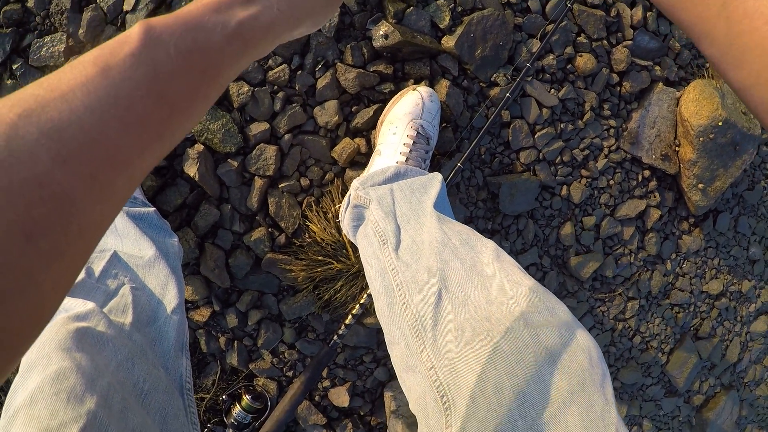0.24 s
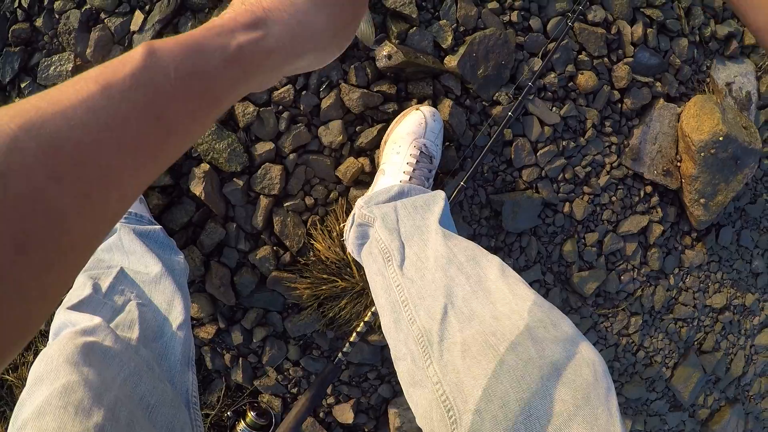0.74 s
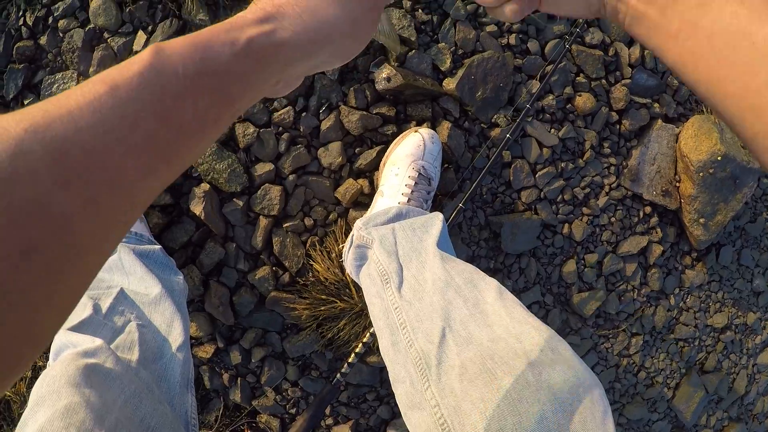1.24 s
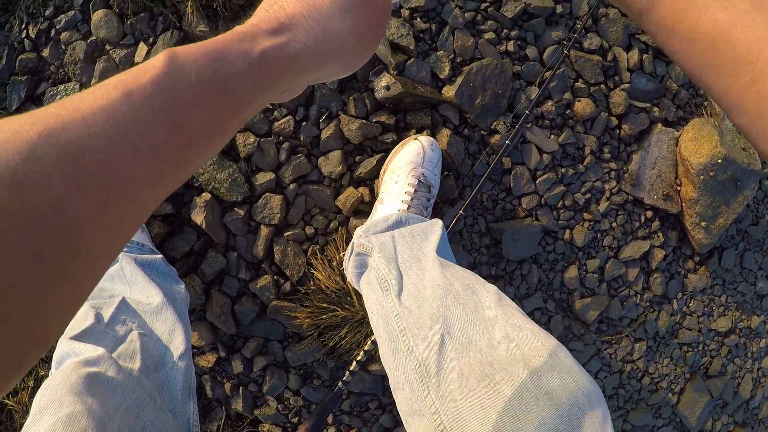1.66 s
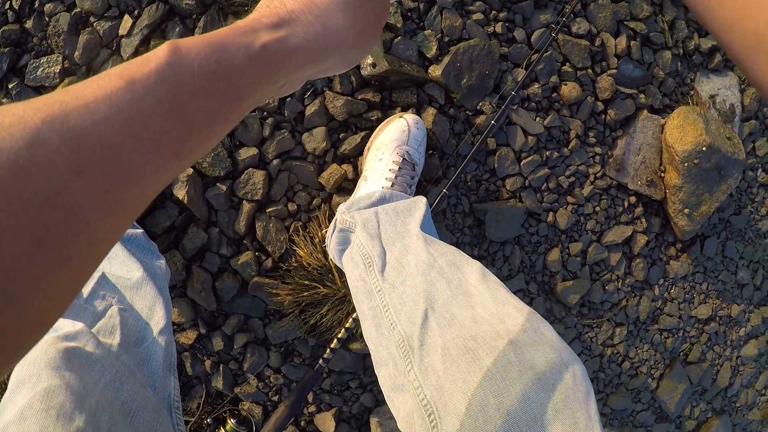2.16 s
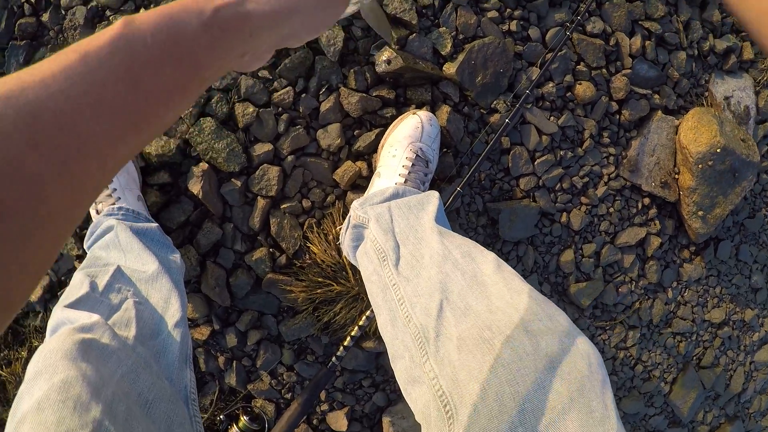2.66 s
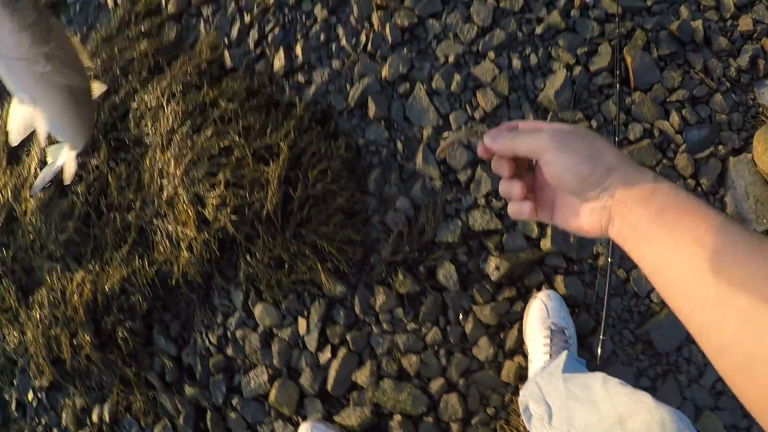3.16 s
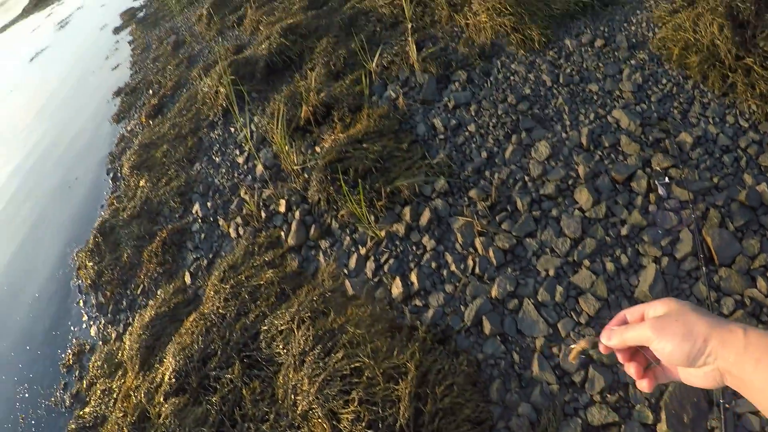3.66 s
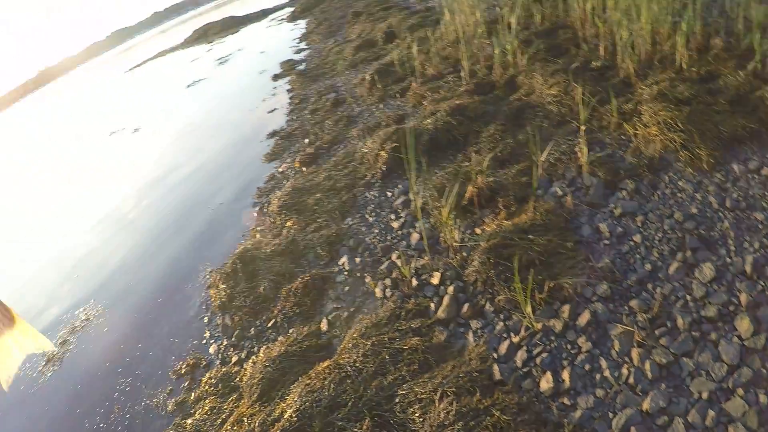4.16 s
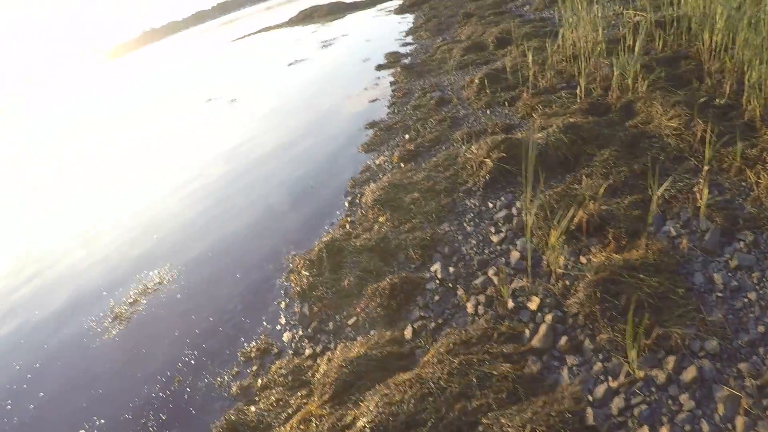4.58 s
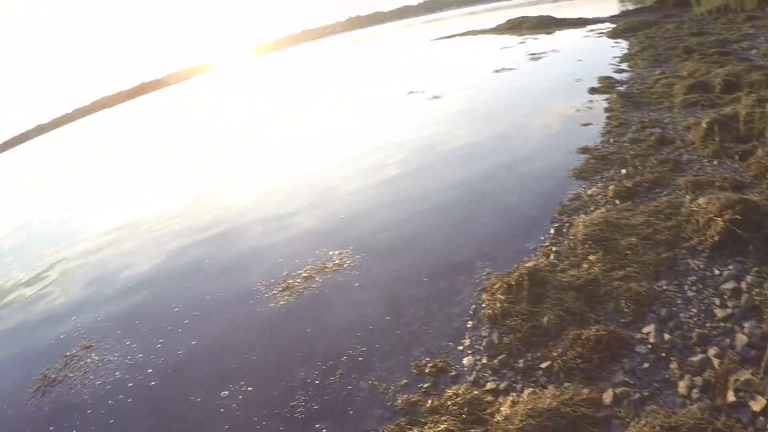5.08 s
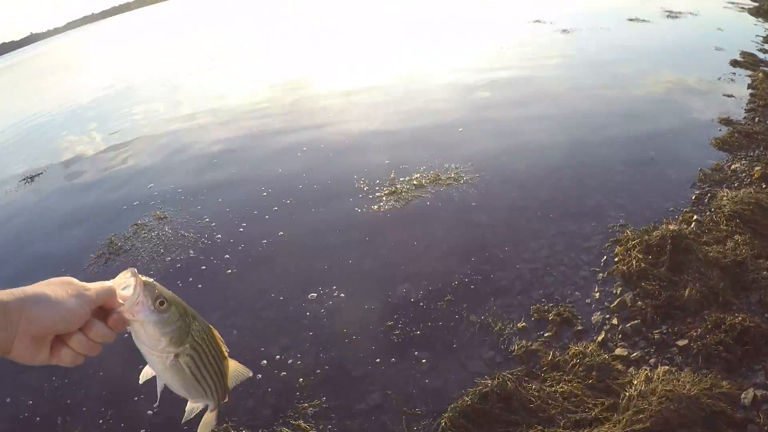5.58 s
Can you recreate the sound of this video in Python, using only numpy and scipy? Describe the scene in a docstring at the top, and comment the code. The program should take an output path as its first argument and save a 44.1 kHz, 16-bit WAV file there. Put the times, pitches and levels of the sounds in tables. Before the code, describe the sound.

Stones tick faintly and a breeze rumbles while a camera's plastic case clacks and rattles in its mount, then briefly scrapes.

```python
"""Light air rumbles on the microphone, clothes rustle faintly and stones tick underfoot.
An angler is carrying a fish over a stony shore to calm water, heard from a camera worn on the body.
Right at the microphone, jolts bump the camera's plastic case softly or knock it against its mount:
the case rings briefly and the padded mount thumps. Near the end, clothing swishes
and something scrapes over the case."""
import sys
import numpy as np
from scipy.fft import rfft, irfft, next_fast_len
from scipy.io import wavfile

SR = 44100
rng = np.random.default_rng(int(sys.argv[2]) if len(sys.argv) > 2 else 0)


def put_to_file(sound):
    """Save the sound as 16-bit audio at rate SR, in the file named by the first command-line argument."""
    columns = np.atleast_2d(sound).T  # one column per channel
    safe = np.clip(columns, -1, 1)
    whole_steps = np.round(safe * 32767)
    wavfile.write(sys.argv[1], SR, whole_steps.astype(np.int16))


N = 257103


def amp(db):
    """Decibels to gain."""
    return 10 ** (np.asarray(db) / 20)


def unit(x):
    """Scale to rms 1."""
    return x / np.sqrt(np.mean(x ** 2) + 1e-20)


def curves(rows):
    """One value per sample for each column after the time."""
    times, *columns = np.transpose(rows)
    return [np.interp(np.arange(N) / SR, times, column) for column in columns]


def swell(s, db, rise, fall, hold=0):
    """An envelope that peaks at time s and may hold there; rise and fall are in dB a second."""
    t = np.arange(N) / SR - s
    return amp(db - rise * np.maximum(-t, 0) - fall * np.maximum(t - hold, 0))


def filtered(x, response):
    """Pass x through a gain that depends on frequency."""
    size = next_fast_len(N + SR // 2)
    return irfft(rfft(x, size) * response(np.fft.rfftfreq(size, 1 / SR)), size)[..., :N]


def coloured(x, spectrum):
    """x shaped by (f/Hz, level/dB) points on a log axis, at rms 1."""
    f, db = np.transpose(spectrum)
    return unit(filtered(x, lambda hz: amp(np.interp(np.log(hz + 1), np.log(f), db))))


def grit(rate, spread_db, smooth):
    """Friction: tiny slips of uneven size, rate a second, on a share of smooth noise."""
    slips = (rng.random(N) < rate / SR) * rng.choice([-1, 1], N)
    sizes = amp(spread_db * rng.standard_normal(N))
    return unit(unit(slips * sizes) + smooth * rng.standard_normal(N))


def ring(modes, attack, scatter_db, detune, pitch=1, length=1):
    """A tenth of a second of struck modes at rms 1; each blow weights and bends them differently."""
    t = np.arange(SR // 10) / SR
    hz, db, t60 = np.transpose(modes)[:, :, None]
    size, bend, phase = rng.standard_normal((3, len(modes), 1))
    onset = 1 - np.exp(-t * np.sqrt(hz / 1e3) / attack)  # high modes speak sooner
    fade = amp(db + scatter_db * size - 60 * t / (t60 * max(length, 0.1))) / t60
    tones = np.sin(2 * np.pi * hz * pitch * (1 + detune * bend) * t + phase)
    return unit(np.sum(onset * fade * tones, 0))


def add(track, s, sound):
    """Mix a sound into the track at time s."""
    part = track[round(s * SR):][:len(sound)]
    part += sound[:len(part)]


# Shore breeze, straight on the microphone: t/s, level/dB
SHORE_BREEZE = [(0, -54), (2.9, -53.5), (3.5, -49), (4.55, -49), (5.2, -44.5), (5.83, -42.5)]
# Puffs on top of it: t/s, level/dB
AIR_PUFFS = [(.05, -47.5), (.6, -45.5), (1.13, -43.5), (1.68, -38), (2.22, -45.5), (4.35, -42), (4.74, -37),
             (4.87, -39), (5.39, -38), (5.5, -26)]
# Rumble of air at the microphone: f/Hz, level/dB
WIND_SPECTRUM = [(10, 2), (20, 7), (33, 7), (50, -2), (75, -16.5), (120, -30.5), (300, -97)]


def wind():
    """A light breeze with short puffs rumbles as it flows over the microphone."""
    breeze_db, = curves(SHORE_BREEZE)
    puffs = sum(swell(s, db, rise=238, fall=211) for s, db in AIR_PUFFS)
    return (amp(breeze_db) + puffs) * coloured(rng.standard_normal(N), WIND_SPECTRUM)


# Background hiss on the shore: f/Hz, level/dB
HISS_SPECTRUM = [(180, -36), (300, -4.5), (439, -6), (631, -7), (849, -4.5), (985, -4), (1140, 0),
                 (1490, -5.5), (1560, -3), (2000, -5.5), (2280, -12.5), (3750, -10.5), (5660, -14.5),
                 (14800, -22), (15500, -32.5)]


def hiss():
    """A faint, steady hiss lies under everything."""
    return amp(-64.5) * coloured(rng.standard_normal(N), HISS_SPECTRUM)


# The angler's motion, just behind the microphone: t/s, case hollow/dB, effort/dB, mount shaking/dB
BODY_MOTION = [(0.0, -69, -67.5, -63), (1.02, -67.5, -70, -64.5), (1.46, -68, -65.5, -60.5),
               (1.7, -70, -71.5, -61.5), (1.9, -69, -70.5, -64.5), (2.66, -65, -67.5, -62),
               (3.07, -63, -62.5, -56), (3.39, -59, -60, -54.5), (3.7, -53, -58, -56), (3.9, -56, -60, -57),
               (4.06, -60, -63, -58.5), (4.47, -57, -62, -59), (4.76, -55.5, -60, -52),
               (5.0, -56, -62.5, -63), (5.2, -59, -65.5, -63), (5.41, -56, -58, -59),
               (5.55, -60.5, -63.5, -58), (5.83, -61.5, -60.5, -55)]
# Air resonances inside the case: f/Hz, width/Hz, level/dB
CASE_CAVITY = [(1270, 690, -10.5), (1733, 195, 1.5)]
# Low shudder, through the mount to the microphone: f/Hz, level/dB
SHUDDER_SPECTRUM = [(40, -10), (90, 4), (180, -4.5), (280, -8.5), (450, -23.5), (800, -31), (1500, -56)]
# Shoe scuffs in the gravel, down at the feet: t/s, level/dB
SHOE_SCUFFS = [(2.82, -66), (2.95, -63), (3.76, -54), (4.7, -54), (5.79, -62)]
# Clothes close by and gravel below: f/Hz, level/dB
RUSTLE_SPECTRUM = [(400, -10.5), (650, -5.5), (850, -7.5), (1200, 2), (1500, -10), (2050, -0.5), (2400, 3),
                   (2900, -4.5), (3400, -7), (4400, -14.5), (5500, -17.5), (8000, -33.5), (15000, -35)]
MEAN_EFFORT_DB = -64


def walking():
    """Walking stirs the air in the case, rubs clothes and gravel, and shakes the mount."""
    def cavity(hz):
        return sum(amp(db) / (1 + (2 * (hz - centre) / width) ** 2) for centre, width, db in CASE_CAVITY)

    hollow_db, effort_db, shaking_db = curves(BODY_MOTION)
    hollow = amp(hollow_db + 0.5) * unit(filtered(rng.standard_normal(N), cavity))
    clothes = amp(-64 + 1.29 * (effort_db - MEAN_EFFORT_DB))
    scuffs = sum(swell(s, db, rise=130, fall=114) for s, db in SHOE_SCUFFS)
    friction = coloured(grit(rate=600, spread_db=4.4, smooth=1.2), RUSTLE_SPECTRUM)
    shudder = coloured(grit(rate=100, spread_db=4.2, smooth=1.0), SHUDDER_SPECTRUM)
    return hollow + np.hypot(clothes, scuffs) * friction + amp(shaking_db + 2) * shudder


# The clearest ticks, from stones underfoot and tackle nearby: t/s, level/dB, relative edge/dB
STONE_TICKS = [(0.0982, -42, -30), (0.2396, -42.5, -26.5), (0.2922, -48.5, -24), (0.3486, -50.5, -18),
               (1.3195, -47, -11), (2.2277, -45.5, -22), (2.7091, -42.5, -30), (2.767, -46.5, -30),
               (2.81, -47, -32), (2.8563, -44, -30), (4.0023, -52, -26), (4.106, -45.5, -21),
               (4.2004, -46.5, -14), (4.2353, -43, -23), (4.7414, -37.5, -8), (4.9466, -46.5, -8),
               (5.7435, -36, -18)]
# A tick's sharp edge: f/Hz, level/dB
EDGE_SPECTRUM = [(2200, -22), (3500, 10.5), (7000, 2), (9500, -10), (12000, -24), (16000, -26)]
# Modes of the plastic case at the microphone; ticks use them pitched down: f/Hz, level/dB, t60/s
CASE_MODES = [(631, -2, 0.024), (1006, -8, 0.042), (1189, 4.5, 0.029), (1292, 4, 0.025), (1697, 2, 0.027),
              (1744, 11, 0.016), (1865, -4, 0.067), (2215, -1, .056), (2390, 2.5, .022), (2696, 2.5, 0.016),
              (2870, 0.5, .028), (3320, -1, 0.0069), (3430, -7, 0.021), (3920, -15.5, 0.022),
              (4324, -12.5, 0.013), (4830, -19.5, 0.025), (5040, -14.5, 0.012), (5730, -22.5, 0.012),
              (6260, -18.5, 0.0084), (6910, -28.5, 0.012), (10100, -35, 0.0062), (10600, -41, .008),
              (13800, -41, 0.0055)]
# Bounds of its low, main, upper, bright and snap families of modes: f/Hz
FAMILY_BOUNDS = [500, 1450, 2100, 3100, 4000, 16000]


def ticks():
    """Stones and tackle touch lightly, each at its own pitch: a clack, a hollow body and a sharp edge."""
    tones, edges = np.zeros((2, N))
    t = np.arange(SR // 50) / SR
    clack_modes = family(FAMILY_BOUNDS[2], FAMILY_BOUNDS[3])
    body_modes = family(FAMILY_BOUNDS[0], FAMILY_BOUNDS[2])
    for s, db, edge_db in list(STONE_TICKS) + settling_stones(count=30):
        clack = ring(clack_modes, attack=0.0019, scatter_db=10, detune=0.044, pitch=0.93)
        body = ring(body_modes, attack=0.00053, scatter_db=-0.5, detune=0.11, pitch=0.85)
        add(tones, s, amp(db - 23) * clack + amp(db - 24.5) * body)
        add(edges, s, amp(db + edge_db - 60 * t / 0.028))
    return tones + edges * coloured(rng.standard_normal(N), EDGE_SPECTRUM)


def settling_stones(count, edge_db=-24):
    """Rows of faint ticks as stones settle at random times, louder as the body moves harder."""
    motion_times, _, effort_db, _ = np.transpose(BODY_MOTION)
    times = rng.random(count) * N / SR
    extra_effort_db = np.interp(times, motion_times, effort_db) - MEAN_EFFORT_DB
    levels = -50.5 + 0.67 * extra_effort_db + rng.standard_normal(count)
    return [(s, db, edge_db) for s, db in zip(times, levels)]


def family(lo_hz, hi_hz):
    """The modes of the case in a range of pitch."""
    return [mode for mode in CASE_MODES if lo_hz <= mode[0] < hi_hz]


# Modes of the mount, between body and camera: f/Hz, level/dB, t60/s
MOUNT_MODES = [(88.8, -3.5, 0.053), (144, 3.5, 0.024), (244.7, -2.5, 0.042), (370, -14.5, 0.023)]
# Soft bumps, through the mount to the microphone: t/s, level/dB
SOFT_BUMPS = [(1.32, -41.5), (3.062, -39.5), (3.338, -32.5), (3.572, -34), (3.8, -34), (3.903, -34),
              (4.004, -34.5), (4.072, -31), (4.108, -34), (4.151, -35.5), (4.201, -36), (4.235, -30.5),
              (4.323, -35), (5.358, -27), (5.611, -39), (5.772, -35.5), (5.809, -34)]


def bumps():
    """Soft jolts move the mount and barely wake the case."""
    shell, thumps = np.zeros((2, N))
    for s, db in SOFT_BUMPS:
        thump = ring(MOUNT_MODES, attack=0.0027, scatter_db=1.5, detune=0.06, pitch=0.984, length=0.97)
        add(thumps, s, amp(db - 15) * thump)
        add(shell, s, amp(db - 31.5) * ring(CASE_MODES, attack=0.0059, scatter_db=8.5, detune=0.058))
    return shell + cushioned(thumps)


def cushioned(x, cutoff_hz=400):
    """The padded mount passes only the low end of a jolt."""
    return filtered(x, lambda hz: 1 / (1 + (hz / cutoff_hz) ** 4))


# Hard knocks, right at the microphone:
# t/s, level/dB, main mode f/Hz, relative thump/dB, flatness/dB, edge/dB
HARD_KNOCKS = [(1.5157, -15.5, 1710, -17.5, 2.5, 5.5), (3.1434, -14.5, 1722, -26.5, -5.5, -8),
               (3.225, -11.5, 1740, -25.5, -2.5, -8.5), (3.2585, -15, 1720, -18, -2, 0),
               (3.2825, -16.5, 1744, -20, 0.5, -1), (3.3665, -15.5, 1740, -22, -1, -5.5),
               (3.4253, -15, 1754, -16, -2, -3.5), (3.4999, -16, 1784, -23, -1.5, -4),
               (3.5417, -16, 1790, -22, -3.5, 0), (3.6459, -19, 1810, -22, -4, 6.5),
               (3.7053, -19.5, 1825, -20, -6, 2.5), (3.816, -16.5, 1796, -24, -6, 8.5),
               (4.826, -10, 1710, -20, 8, 2.5), (5.3263, -16, 1763, -16.5, 1, 2.5),
               (5.3446, -21.5, 1700, -11, 5.5, 0), (5.4666, -26.5, 1700, -10, 5, 9.5),
               (5.4746, -31.5, 1700, -8, 5, 9), (5.4813, -32.5, 1935, -5.5, 8, 8),
               (5.4903, -29, 1990, -6.5, 4.5, 11)]
# What each family of modes takes of a blow: level/dB, share of flatness, share of edge
BLOW_SHARES = [(-17, 0.93, 0.11), (-7, -0.032, 0.016), (-12, 0.28, 0.17), (-25, 0.01, 1), (-32, 0, 1)]
# The crack at the first instant of contact: f/Hz, level/dB
CRACK_SPECTRUM = [(3000, 8), (6500, 1), (8500, -19), (10500, -2), (12000, -4), (13600, -3), (15500, -18)]


def knocks():
    """The case strikes its mount: a flat blow booms in the low modes, a corner snaps in the high ones."""
    shell, thumps, cracks = np.zeros((3, N))
    t = np.arange(SR // 50) / SR
    main_mode = max(CASE_MODES, key=lambda mode: mode[1])
    for s, db, main_hz, thump_db, flat_db, edge_db in HARD_KNOCKS:
        length = 0.93 - 0.0264 * edge_db  # sharper blows ring shorter
        for lo, hi, (base_db, by_flat, by_edge) in zip(FAMILY_BOUNDS, FAMILY_BOUNDS[1:], BLOW_SHARES):
            modes = family(lo, hi)
            # the point of contact bends the main family's pitch
            pitch = main_hz / main_mode[0] if main_mode in modes else 1
            family_db = db + base_db + by_flat * flat_db + by_edge * edge_db
            ringing = ring(modes, attack=0.0046, scatter_db=2.5, detune=0.0096, pitch=pitch, length=length)
            add(shell, s, amp(family_db - 14.5) * ringing)
        thump = ring(MOUNT_MODES, attack=0.0016, scatter_db=1.5, detune=0.06, pitch=0.99, length=0.89)
        add(thumps, s + 0.00078, amp(db + thump_db - 7.5) * thump)
        add(cracks, s - 0.0004, amp(0.31 * db - 40 - 60 * t / 0.01))  # grows less than the blow
    return shell + cushioned(thumps) + cracks * coloured(rng.standard_normal(N), CRACK_SPECTRUM)


# Cloth sliding close to the microphone: f/Hz, level/dB
CLOTH_SPECTRUM = [(1500, -20), (2800, -0.5), (4200, 5), (5200, -11), (8000, -22)]


def cloth_swish():
    """Clothing swishes briefly as the body turns."""
    friction = coloured(grit(rate=2000, spread_db=3, smooth=0.87), CLOTH_SPECTRUM)
    return swell(s=5.07, db=-64, rise=108, fall=108) * friction


# A rub on the case itself, right at the microphone: f/Hz, level/dB
RUB_SPECTRUM = [(300, -10), (700, -11), (950, 3), (1400, -7), (1800, 8), (2300, 1), (3000, 0.5),
                (3700, -11), (4400, -6), (5300, -31), (8000, -31)]
# Its bright, fizzing end: f/Hz, level/dB
FIZZ_SPECTRUM = [(2500, -21), (4400, 15), (8000, 1), (11000, -18.5), (14000, -8), (16000, -18)]


def scrape():
    """Something grips the case, slides in quick slips and fizzes just before letting go."""
    rub = coloured(grit(rate=800, spread_db=3, smooth=0.35), RUB_SPECTRUM)
    rub *= swell(s=5.386, db=-39, rise=1100, fall=450, hold=0.026)
    fizz = coloured(grit(rate=1800, spread_db=3.8, smooth=0.62), FIZZ_SPECTRUM)
    fizz *= swell(s=5.414, db=-45.5, rise=650, fall=1500)
    return rub + fizz


def scene():
    """All sources at the one body-worn microphone."""
    contacts = knocks() + bumps() + ticks() + scrape()
    return (contacts + cloth_swish() + walking() + wind() + hiss())[None]


def record(dry, top_hz=15500):
    """The camera keeps nothing above its band limit."""
    return filtered(dry, lambda hz: hz < top_hz)


dry = scene()
out = record(dry)
put_to_file(out)
```